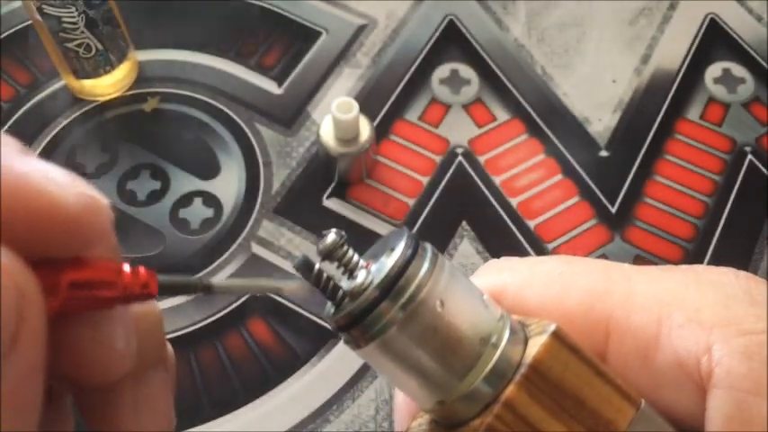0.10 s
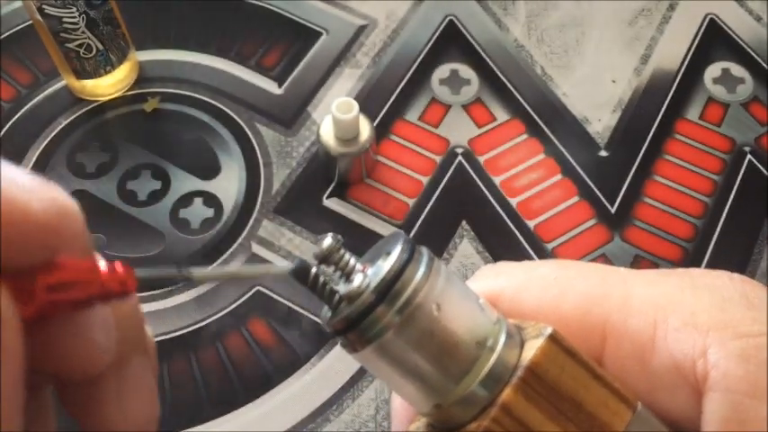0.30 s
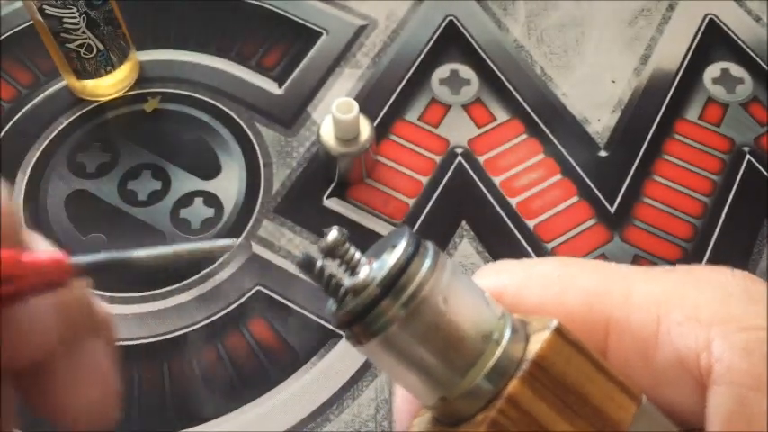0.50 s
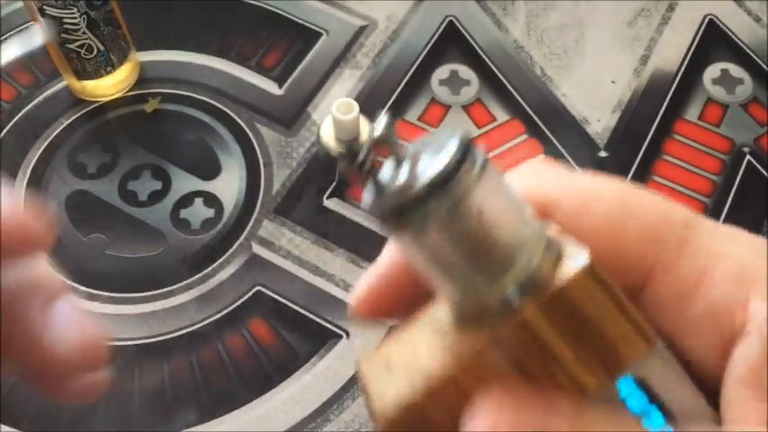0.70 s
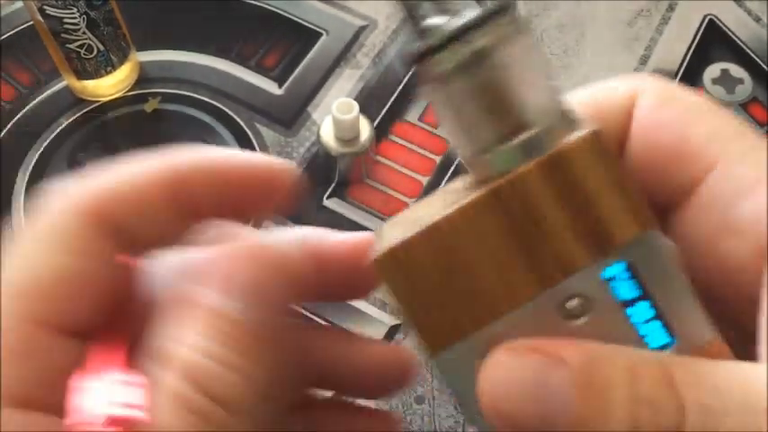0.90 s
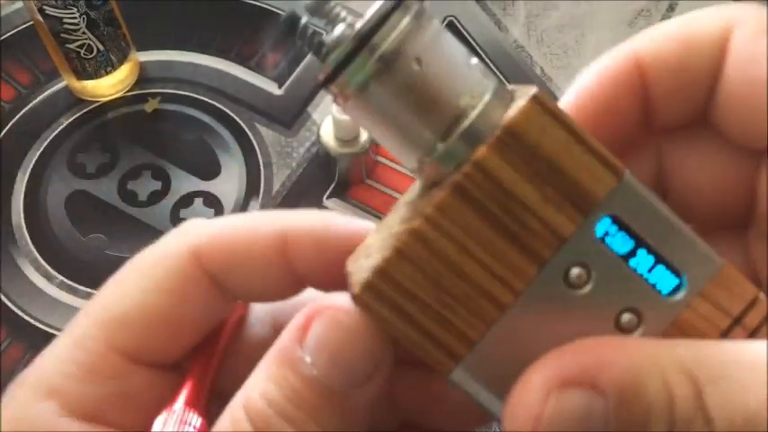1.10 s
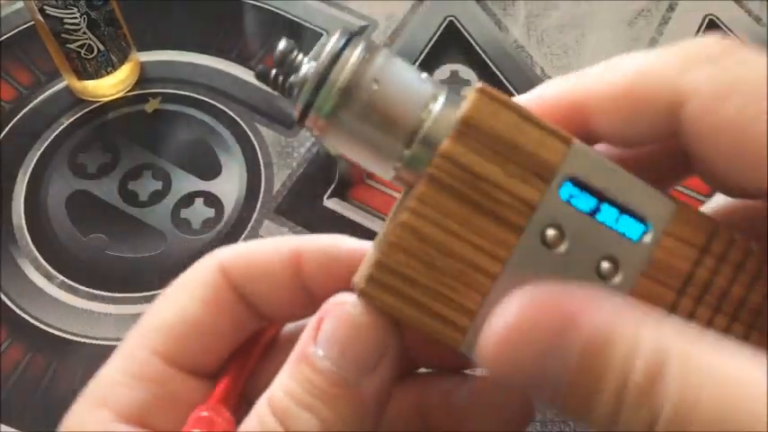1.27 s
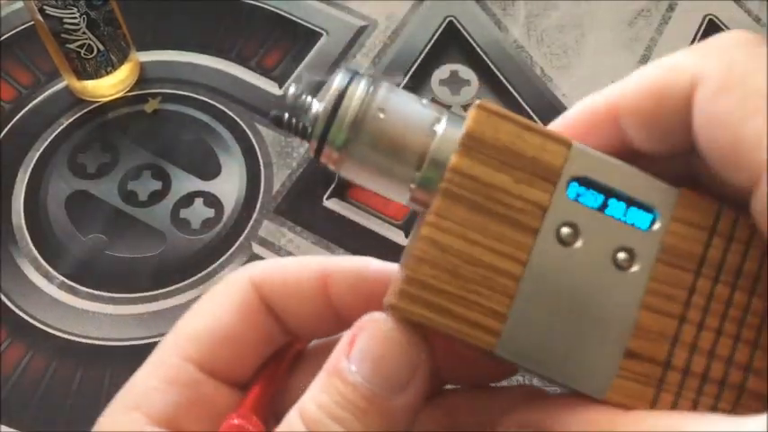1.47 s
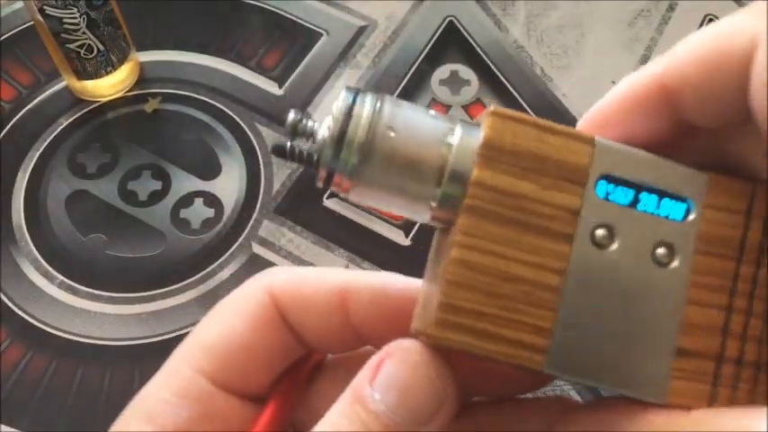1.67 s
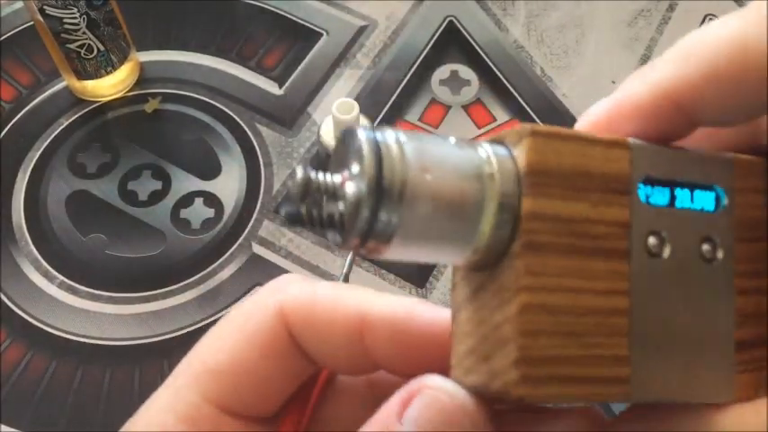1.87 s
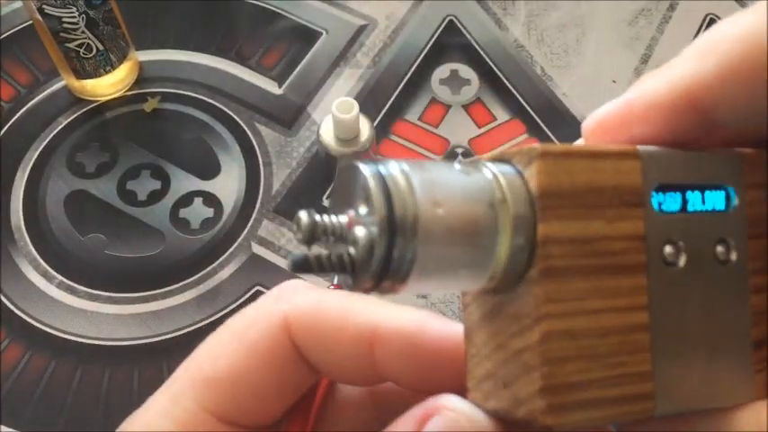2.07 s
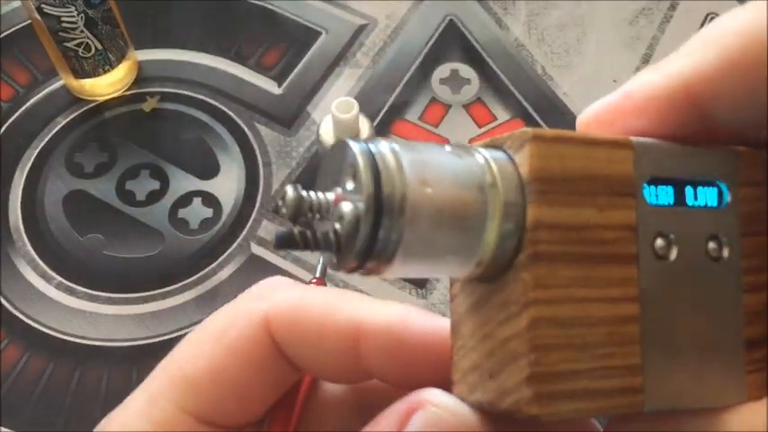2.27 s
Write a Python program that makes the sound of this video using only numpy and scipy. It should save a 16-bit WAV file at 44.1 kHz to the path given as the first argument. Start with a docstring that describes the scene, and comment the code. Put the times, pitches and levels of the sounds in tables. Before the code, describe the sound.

Faint crackling sizzle of a heated wire coil, with sharp metallic tweezer clinks and a late button click.

```python
"""A low wavering hum and the faint sizzle of a hot vape coil come first, close up in a small room.
The coil, boiling its liquid, crackles, pops and spurts: shaped noise and short noise bursts.
Steel tweezers clink, scrape and rattle on it: contact noise, and damped or sustained modes of the steel.
Hands bump the wooden case, and its fire button clicks down and up: a snap, a spring and a hollow ring."""
import sys
import numpy as np
from scipy import signal
from scipy.fft import rfft, irfft, next_fast_len
from scipy.io import wavfile
from scipy.ndimage import map_coordinates

SR = 44100
rng = np.random.default_rng(int(sys.argv[2]) if len(sys.argv) > 2 else 0)


def log_audio(samples):
    """Write samples as a 16-bit WAV file to the path given in sys.argv[1]."""
    # one column per channel
    frames = np.atleast_2d(samples).T
    # limit to full scale, then quantise
    limited = np.clip(frames, -1, 1)
    pcm = np.round(limited * 32767).astype(np.int16)
    wavfile.write(sys.argv[1], SR, pcm)


N = 108045  # samples in the scene
T = np.arange(SR // 4) / SR  # time within one event, s
TOP_HZ = 15850  # upper band limit
PHASE_WANDER = 0.25  # radians per unit of wobble, in damped and sliding modes alike

# Noise spectrum of steel tips touching. Each row: frequency in Hz, relative level in dB.
CONTACT_SPECTRUM = [(300, -52), (1900, -15.5), (2350, -3.5), (2900, -4), (3700, 2.5), (5200, -5.5),
                    (6300, 1), (7300, -11.5), (15000, -17)]


def amp(db):
    """Decibels are twenty times the logarithm of an amplitude ratio."""
    return 10 ** (np.asarray(db) / 20)


def unit(x):
    """Scaling by the root mean square brings a signal to an rms of 1."""
    return x / np.sqrt(np.mean(x ** 2) + 1e-20)


def along(points, hz):
    """(Hz, value) points are joined on a logarithmic frequency axis, where octaves are equally wide."""
    f, v = np.transpose(points)
    return np.interp(np.log(hz + 1), np.log(f + 1), v)


def curve(rows):
    """(s, value) points are joined by straight lines, giving one value per sample."""
    return np.interp(np.arange(N) / SR, *np.transpose(rows))


def wobble(rate, size):
    """A smooth random modulation: a spline through normal random knots, rate of them a second."""
    knots = rng.standard_normal(2048)
    return map_coordinates(knots, [np.arange(size) * rate / SR], mode="mirror")


def filtered(x, gain):
    """Linear filtering: the spectrum is multiplied by a gain that depends on frequency."""
    m = next_fast_len(len(x) + 4096)  # padding keeps the end from wrapping onto the start
    hz = np.fft.rfftfreq(m, 1 / SR)
    return irfft(rfft(x, m) * gain(hz), m)[:len(x)]


def noise(spectrum, size=len(T)):
    """Coloured noise: white noise filtered to a spectrum, at an rms of 1."""
    white = rng.standard_normal(size)
    return unit(filtered(white, lambda hz: amp(along(spectrum, hz))))


def fade(t60):
    """Exponential decay: the level falls by 60 dB in t60 seconds."""
    return np.exp(-np.log(1000) * T / t60)


def burst(spectrum, envelope):
    """An impact's noise: coloured noise under an envelope, with that envelope's energy."""
    x = noise(spectrum) * envelope
    return x * np.linalg.norm(envelope) / np.linalg.norm(x)


def ring(modes):
    """Modal synthesis: a struck body sounds as damped sines, slightly varied in level and pitch each blow."""
    total = np.zeros(len(T))
    for hz, db, t60 in modes:
        level = amp(db + rng.normal(0, 0.5))
        phase = 2 * np.pi * hz * rng.normal(1, 0.0027) * T + PHASE_WANDER * wobble(330, len(T))
        total += level * fade(t60) * np.sin(phase)
    return total * (1 - fade(0.0013))  # soft onset


def add(out, s, x):
    """Superposition: an event is summed in from s seconds, and cut at the end of the scene."""
    i = max(round(s * SR), 0)
    out[i:i + len(x)] += x[:max(N - i, 0)]


def background():
    """A steady tone with slowly wandering phase and uneven level, over the broadband noise of the room's air."""
    # Swell of the hum. Each row: time in seconds, relative level in dB.
    hum_level = [(0.0, -57.5), (0.03, -54), (0.67, -58), (0.71, -74), (0.8, -57), (0.83, -67.5),
                 (1.11, -77), (1.19, -65), (1.24, -95), (1.33, -62.5), (1.54, -84), (1.66, -62.5),
                 (1.86, -83), (1.97, -55.5), (2.14, -76), (2.24, -51.5), (2.28, -63), (2.45, -65.5)]
    # Spectrum of the air. Each row: frequency in Hz, relative level in dB.
    air_spectrum = [(20, -25), (35, -9), (55, 8), (80, 1.5), (130, -2), (180, -5), (240, -2.5),
                    (400, -14.5), (1000, -13.5), (3000, -17.5), (15000, -25)]
    hum_hz, hum_wander, air_db = 51, 0.17, -66  # Hz, radians per unit of wobble, rms in dB
    phase = 2 * np.pi * hum_hz * np.arange(N) / SR + hum_wander * wobble(2.7, N)
    hum = np.sqrt(2) * np.sin(phase)  # rms of 1
    return amp(curve(hum_level) + 1) * hum + amp(air_db) * noise(air_spectrum, N)


def pop():
    """A bursting droplet releases an impulse of noise with a weaker, slower tail; its peak is 1."""
    # Spectrum of a pop. Each row: frequency in Hz, relative level in dB.
    pop_spectrum = [(200, -42), (1200, 5.5), (4000, 0.5), (8000, -0.5), (12500, 5.5), (16000, -4)]
    t60, tail_db, tail_t60 = 0.0009, -25.5, 0.011  # s, dB, s
    x = noise(pop_spectrum) * (fade(t60) + amp(tail_db) * fade(tail_t60))
    x = filtered(x, lambda hz: hz < TOP_HZ)
    return x / np.abs(x).max()


def coil():
    """Liquid boiling off hot wire: continuous sizzle and spurts, with a random shower of cracks and larger pops."""
    # Swell of the sizzle. Each row: time in seconds, relative level in dB.
    sizzle_level = [(0.015, -65.5), (0.09, -71), (0.15, -64.5), (0.32, -58), (0.395, -63.5), (0.52, -62),
                    (0.585, -57.5), (0.78, -61), (0.84, -71.7), (0.96, -62.5), (1.07, -61.5), (1.16, -68.5),
                    (1.3, -65.5), (1.44, -69), (1.51, -68), (1.545, -71), (1.88, -71.3), (2.1, -70),
                    (2.28, -64), (2.43, -68)]
    # Spectrum of sizzle and spurts. Each row: frequency in Hz, relative level in dB.
    fizz_spectrum = [(500, -19), (2000, -10), (5000, -6), (7800, -6), (9500, 0.5), (10500, -6),
                     (12400, 1.5), (13700, 1), (14500, 3.5), (16000, -16)]
    # Brief jets of vapour. Each row: start in seconds, length in seconds, level in dB.
    spurts = [(1.393, 0.016, -58.5), (1.499, 0.02, -57), (1.517, 0.0075, -58)]
    # Larger pops. Each row: start in seconds, peak in dB.
    pops = [(0.1647, -41), (.358, -37), (0.4852, -32), (0.5108, -35), (0.53, -37), (0.7154, -35),
            (0.7574, -37.5), (0.78, -37), (0.8218, -37), (.877, -39), (0.9177, -35), (1.083, -37),
            (1.2011, -34.5), (1.3954, -44.5), (1.4555, -38), (1.6171, -38.5), (1.7912, -38), (1.8003, -43),
            (1.8415, -39), (1.948, -38), (1.9612, -29), (1.9946, -42), (2.064, -44), (2.0794, -34.5),
            (2.221, -34.5), (2.2269, -35), (2.3095, -37), (2.4085, -43), (2.4231, -37), (2.4368, -40)]
    sizzle_db = -2.5  # added to the swell
    crack_count, least_db, spread_db, most_above_db = 560, -55.5, 3.6, 10
    follow = 0.28  # share of the sizzle's swell, in dB, that the cracks follow

    level_db = curve(sizzle_level)
    out = amp(level_db + sizzle_db + 2.1 * wobble(120, N)) * noise(fizz_spectrum, N)
    for s, length, db in spurts:
        jet = unit(noise(fizz_spectrum) * amp(4.2 * wobble(1500, len(T))))
        arch = np.sin(np.pi * np.minimum(T / length, 1))
        add(out, s, amp(db) * jet * arch)
    for s, db in pops:
        add(out, s, amp(db) * pop())

    cracks = np.zeros(N)
    shapes = [pop() for _ in range(32)]  # used in turn
    for k, (when, size) in enumerate(rng.random((crack_count, 2))):
        above_db = min(-spread_db * np.log(size), most_above_db)  # exponential spread, capped
        add(cracks, when * N / SR, amp(least_db + above_db) * shapes[k % len(shapes)])
    return out + cracks * amp(follow * (level_db - level_db.mean()))


def tweezers():
    """Impact excitation: each contact gives a short rasp and a ping, rings the steel and knocks the case."""
    # Contacts. Each row: start in seconds, rasp level in dB, rasp t60 in seconds, treble level in dB,
    # ping level in dB, ping pitch in Hz, steel ring level in dB, case knock level in dB.
    clinks = [(0.2421, -37.5, 0.023, -43, -43, 3530, -58, -66),
              (.2450, -41, 0.038, -54, -43, 3930, -50, -59),
              (0.2462, -25, 0.0078, -23.5, -29, 4020, -54, -46.5),
              (.2656, -30, 0.0075, -25, -23.5, 4800, -60, -54.5),
              (.2857, -40, 0.018, -55, -45, 5810, -51, -72), (.4165, -46, 0.0091, -54, -37, 3900, -56, -48),
              (.4252, -39, 0.0072, -56, -37, 4070, -51, -70),
              (.4328, -41.5, 0.051, -44, -41, 3850, -58, -57),
              (.4375, -24, 0.0075, -32, -19.5, 4040, -33.5, -45),
              (.4452, -37, 0.013, -33, -44, 4460, -60, -74),
              (.4490, -21, 0.0072, -18.5, -26, 4920, -55, -48.5),
              (.4620, -29, .010, -22.5, -27.5, 3680, -38.5, -47.5),
              (.4650, -33, 0.014, -39, -30.5, 3505, -53, -72),
              (.6108, -32.5, 0.01, -34, -37, 2250, -55, -44.5),
              (.6160, -34.5, 0.012, -40, -41, 3540, -49, -82),
              (.6198, -36, 0.011, -29, -37, 3950, -36.5, -46.5),
              (.6415, -28.5, 0.011, -29, -33, 5620, -35.5, -54),
              (.6452, -29.5, 0.018, -31, -31, 4670, -62, -46),
              (.6513, -40, 0.0092, -40, -33, 5450, -48, -72), (.6570, -29, 0.011, -39, -29, 6040, -44, -56),
              (.6595, -47, 0.027, -39, -34.5, 3390, -45, -67),
              (.6708, -48, 0.0073, -52, -39, 5640, -50.5, -63),
              (.9950, -43, 0.027, -65, -37, 5800, -49.5, -80),
              (1.0160, -40, 0.0066, -56, -61, 5500, -61, -89),
              (1.0250, -32, 0.011, -30.5, -21.5, 5920, -41.5, -72),
              (1.1073, -49, 0.013, -44, -70, 4600, -61, -90),
              (1.1174, -34, 0.019, -49, -39.5, 2450, -59, -79),
              (1.1193, -37, 0.0096, -37, -25, 5880, -53, -86),
              (1.1218, -58, 0.0081, -42, -32, 4310, -56, -82)]
    # Spectrum of the treble part. Each row: frequency in Hz, relative level in dB.
    treble_spectrum = [(3000, -33), (6500, -2.5), (8800, -2), (10200, -5), (11500, 0.5), (13000, 2.5),
                       (13600, 13), (14200, 2), (16000, -10)]
    # Modes of the tweezers. Each row: frequency in Hz, relative level in dB, t60 in seconds.
    steel_modes = [(2790, -14, 0.084), (3360, -9.5, 0.13), (3495, -4, 0.056), (3700, -10.5, 0.1),
                   (5897, 4, 0.035), (6230, -6.5, 0.059), (9010, -12, 0.064), (13000, -14, 0.056),
                   (13480, 4, 0.034)]
    # Modes of the knocked case. Each row: frequency in Hz, relative level in dB, t60 in seconds.
    case_modes = [(145.4, -4.5, 0.048), (590, -6, 0.049), (645, -9, 0.055), (966, -3, 0.056),
                  (1680, -5, 0.023)]
    attack_s, ping_lasts = 0.00031, 1.64  # time constant; ping t60 over rasp t60

    out = np.zeros(N)
    rise = 1 - np.exp(-T / attack_s)
    for s, rasp_db, t60, treble_db, ping_db, hz, ring_db, knock_db in clinks:
        envelope = rise * fade(t60)
        rasp = amp(rasp_db) * burst(CONTACT_SPECTRUM, envelope)
        treble = amp(treble_db) * burst(treble_spectrum, envelope)
        ping = ring([(hz, ping_db, ping_lasts * t60)])
        steel = amp(ring_db) * ring(steel_modes)
        knock = amp(knock_db) * ring(case_modes)
        add(out, s, rasp + treble + ping + steel + knock)
    return out


def scrapes():
    """Friction drive: sliding tips keep the steel singing, with a little grit and a varying share of upper modes."""
    # Slides. Each row: start in seconds, length in seconds, song level in dB, grit level in dB,
    # boost of the upper modes in dB.
    slides = [(0.249, 0.036, -56, -49, -5), (.436, .07, -49, -48.5, -3), (0.658, 0.076, -55, -66, -12),
              (0.88, 0.074, -61.5, -75, -14), (0.933, 0.02, -45.5, -51.5, -5),
              (0.9448, 0.027, -42, -53, 6.5)]
    # Modes that sliding keeps singing. Each row: frequency in Hz, relative level in dB.
    squeal_modes = [(3400, -1), (3520, -13), (5890, 2), (6050, -10)]
    flutter_db, upper_hz = 6.5, 4500  # dB per unit of wobble; upper modes lie above this

    out = np.zeros(N)
    for s, length, db, grit_db, upper_db in slides:
        song = np.zeros(len(T))
        for hz, level in squeal_modes:
            mode_db = level + upper_db * (hz > upper_hz) + flutter_db * wobble(239, len(T))
            phase = 2 * np.pi * hz * T + PHASE_WANDER * wobble(200, len(T))
            song += amp(mode_db) * np.sin(phase)
        grit = unit(noise(CONTACT_SPECTRUM) * amp(3.7 * wobble(913, len(T))))
        envelope = (1 - fade(0.0036)) * np.sqrt(np.clip(1 - T / length, 0, 1))
        add(out, s, (amp(db) * unit(song) + amp(grit_db) * grit) * envelope)
    return out


def bumps():
    """A heavily damped resonance: hands nudge the case, which answers with a few cycles."""
    # Bumps. Each row: start in seconds, level in dB, pitch in Hz.
    nudges = [(0.653, -48, 85.5), (1.607, -43.5, 518), (2.368, -54.5, 140)]
    cycles = 10  # to fall by 60 dB
    out = np.zeros(N)
    for s, db, hz in nudges:
        add(out, s, ring([(hz, db, cycles / hz)]))
    return out


def button():
    """Snap action: a noise impulse, dull going down and bright coming up, excites spring, case and room."""
    # Clicks down and up. Each row: start in seconds, snap level in dB, snap tilt in dB per octave,
    # spring level in dB, hollow ring level in dB.
    clicks = [(1.6068, -47, -9.5, -58, -53), (2.1697, -24.5, 2.5, -30.5, -45)]
    # Spectrum of the snap before its tilt. Each row: frequency in Hz, relative level in dB.
    snap_spectrum = [(200, -33), (600, -19), (1200, -29), (1900, -0.5), (2700, 12), (3300, 4.5),
                     (4700, -5.5), (6000, 1), (6800, -24), (7600, -2.5), (9500, -16), (15000, -15.5)]
    # Answer of case and room. Each row: frequency in Hz, relative level in dB.
    hollow_spectrum = [(120, -31), (200, -5.5), (307, -2.5), (436, -6), (774, -4.5), (1290, -10),
                       (1560, -3), (3000, -9), (4990, -24), (5850, -19), (9000, -19), (11700, -50),
                       (19800, -120)]
    # Modes of the spring. Each row: frequency in Hz, relative level in dB, t60 in seconds.
    spring_modes = [(4060, -1, 0.019), (7430, -7.5, 0.013)]
    snap_t60, hollow_t60 = 0.0085, 0.15  # s

    out = np.zeros(N)
    for s, db, tilt_db, spring_db, hollow_db in clicks:
        tilted = [(hz, level + tilt_db * np.log2(hz)) for hz, level in snap_spectrum]
        snap = amp(db) * burst(tilted, fade(snap_t60))
        spring = amp(spring_db) * ring(spring_modes)
        hollow = amp(hollow_db) * burst(hollow_spectrum, fade(hollow_t60))
        add(out, s, snap + spring + hollow)
    return out


def room(x):
    """Diffuse reverberation: convolution with decaying noise of unit energy that dies sooner in the treble."""
    # Reverberation time. Each row: frequency in Hz, t60 in seconds.
    room_t60 = [(200, .3), (2000, .24), (6000, .15), (14000, .12)]
    hz, t, z = signal.stft(rng.standard_normal(SR // 2), SR, nperseg=256)
    decay = amp(-60 * t / along(room_t60, hz)[:, None])
    tail = signal.istft(z * decay, SR, nperseg=256)[1]
    return signal.fftconvolve(x, tail / np.linalg.norm(tail))[:N]


def scene():
    """Superposition of the near sources, their reverberation and the background, in one channel."""
    room_db = -23
    near = coil() + tweezers() + scrapes() + bumps() + button()
    return (near + amp(room_db) * room(near) + background())[None]


def record(dry):
    """Band limiting: a low-pass gain falls from 1 to 0 over 100 Hz around the limit."""
    return np.array([filtered(x, lambda hz: np.clip((TOP_HZ - hz) / 100 + .5, 0, 1)) for x in dry])


dry = scene()
out = record(dry)
log_audio(out)
```